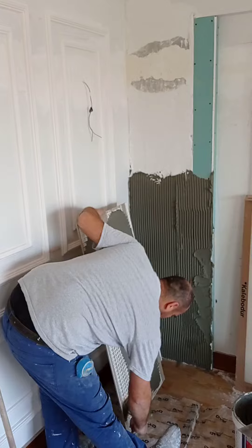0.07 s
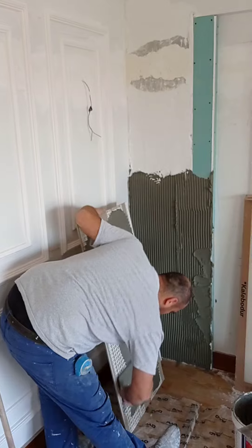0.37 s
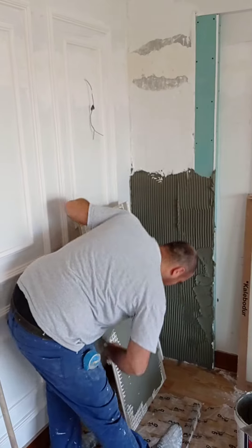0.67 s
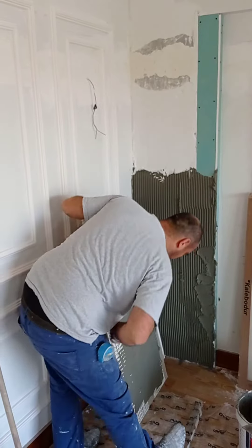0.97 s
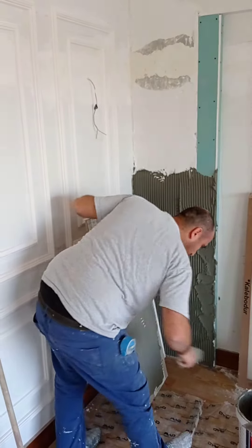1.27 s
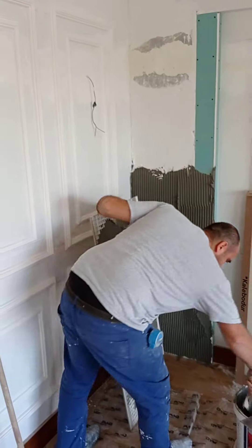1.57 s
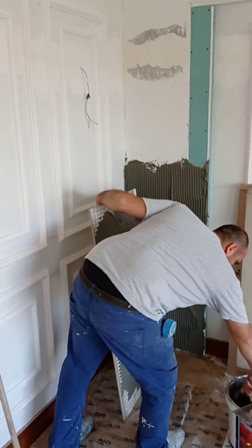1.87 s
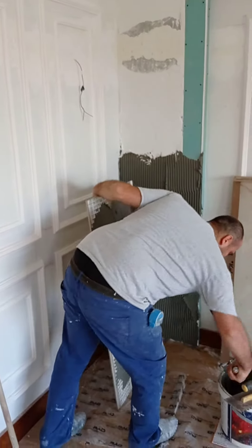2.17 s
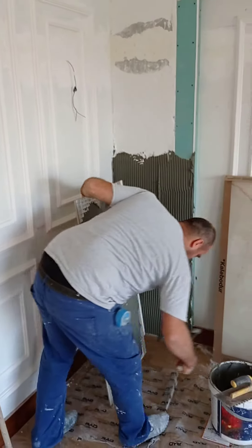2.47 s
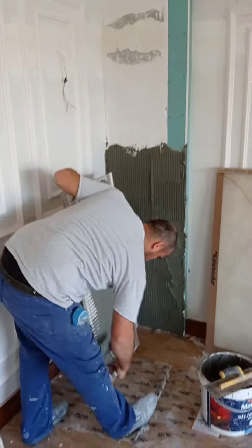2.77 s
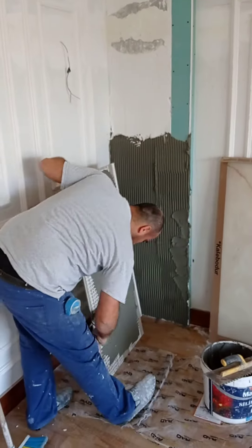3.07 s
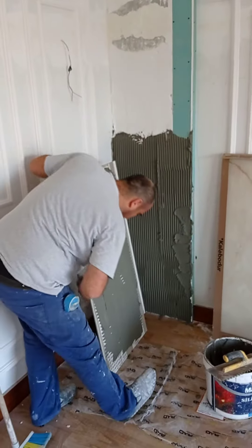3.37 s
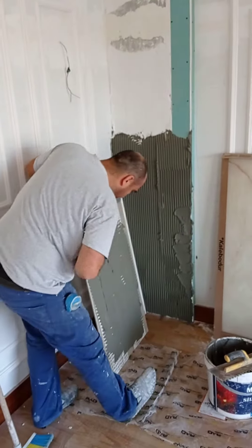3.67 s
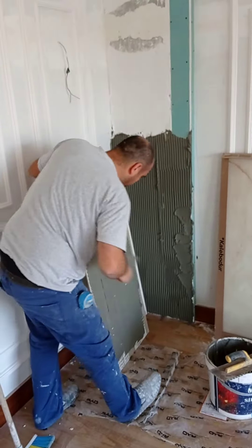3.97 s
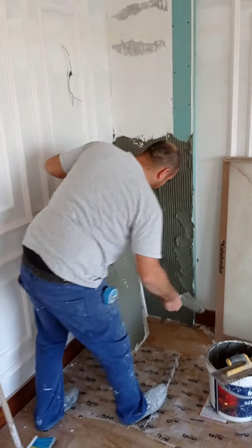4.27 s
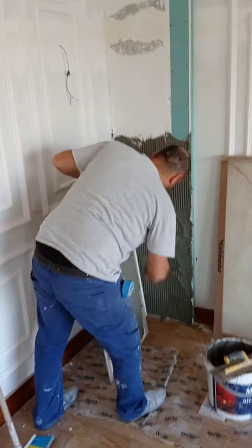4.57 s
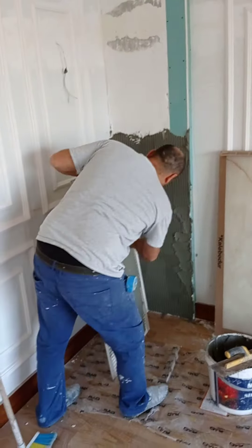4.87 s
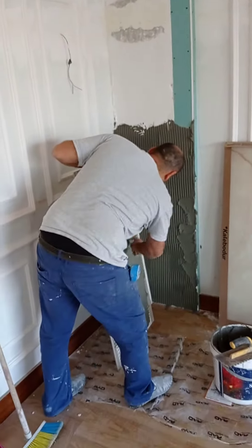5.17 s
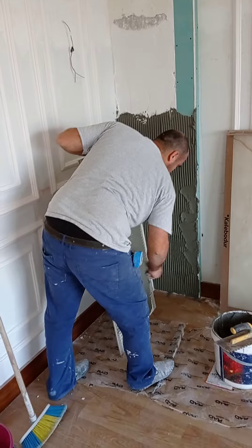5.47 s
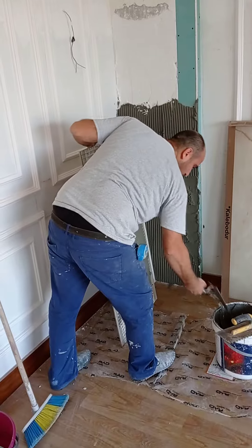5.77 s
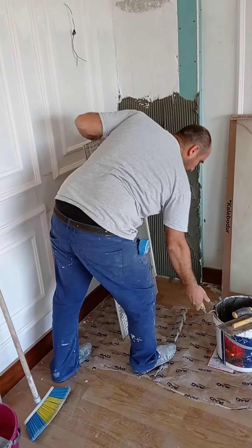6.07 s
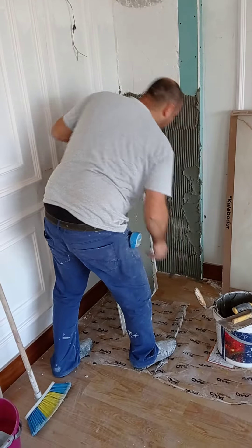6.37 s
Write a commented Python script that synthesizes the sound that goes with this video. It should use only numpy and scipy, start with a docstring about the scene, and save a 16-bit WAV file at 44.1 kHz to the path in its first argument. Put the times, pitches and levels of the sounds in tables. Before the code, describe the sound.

Three rasping trowel strokes over stone, with gritty clacks, a wet scoop and a hollow bucket knock, echo off bare walls.

```python
"""A notched steel trowel combs tile adhesive over a leaning stone slab: three strokes in a bare, echoing room.
Its teeth stick and slip on the stone, sand crunches under them, and slab and room drone together.
Between strokes it scoops from a plastic bucket and knocks on it; a shoe shuffles and the work ticks.
The microphone stands off in the room's echo, over a low rumble and a soft hush. The worker's body
shades the blade; bucket and slab arrive more directly. Both channels are alike."""
import sys
import numpy as np
from scipy import signal
from scipy.fft import rfft, irfft, next_fast_len
from scipy.io import wavfile
from scipy.ndimage import map_coordinates

SR = 44100
rng = np.random.default_rng(int(sys.argv[2]) if len(sys.argv) > 2 else 0)


def materialize(psi):
    """Save the field psi as 16-bit PCM at rate SR to the path in sys.argv[1].

    A 1-D psi becomes a single channel; in a 2-D psi each row is a channel.
    """
    bounded = np.clip(np.atleast_2d(psi).T, -1, 1)
    quanta = np.round(bounded * 32767).astype(np.int16)
    wavfile.write(sys.argv[1], SR, quanta)


N = 287532

# the blade lands on the slab: t/s, clack/dB, thud/dB, crunch/dB
BLADE_LANDINGS = [(0.131, -47, -44, -65), (0.148, -57, -40, -78), (2.942, -27, -30.5, -34.5),
                  (3.379, -21, -42, -27), (4.963, -40.5, -40.5, -45)]
# sandy crunch, with a thin microphone resonance near 15 kHz: f/Hz, level/dB
CRUNCH_SPECTRUM = [(1500, -50), (2500, -2), (3200, -4.5), (4200, -3), (5100, -5.5), (6600, -3.5),
                   (8000, -13), (10000, -17.5), (13500, -34), (15300, -22)]
# spectrum of the trowel's clack on slab or bucket: f/Hz, level/dB
CLACK_SPECTRUM = [(80, -9.5), (300, 15), (580, -4.5), (900, 8.5), (1400, 4), (2200, -4.5), (2900, -14.5),
                  (3600, -14), (5000, -14), (7100, -18.5), (10000, -33), (15000, -41)]


def pushing():
    """How hard the arm's pushes excite blade, stone and sand: each bites, then eases as it goes on."""
    # t/s, rise/s, length/s, blade level/dB, stone over blade/dB, sand over blade/dB, extra sand rise/s
    pushes = [(0.087, 0.28, 0.32, -26, -8.5, -9.5, 0.0022), (0.374, 0.032, 0.27, -19, -7, -11.5, 0.011),
              (0.616, 0.058, 0.19, -18.5, -3, -3.5, 0), (2.935, .012, 0.15, -43, 8, 1.5, 0.001),
              (2.994, 0.22, 0.29, -27, 2.5, -2.5, 0), (3.355, 0.028, 0.33, -22, -2.5, -8, 0.024),
              (5.041, 0.04, 0.25, -21.5, -9, -6.5, 0.046)]
    bite = dict(release=0.12, power=1.49)
    steel = stone = sand = 0
    for start, rise, length, db, stone_db, sand_db, gather in pushes:
        steel += amp(db) * swell(start, rise, length, sag_db_per_s=32.5, **bite)
        stone += amp(db + stone_db) * swell(start, rise, length, sag_db_per_s=21.5, **bite)
        # grains gather under the teeth, so the crunch swells for longer
        sand += amp(db + sand_db) * swell(start, rise + gather, length, sag_db_per_s=16, **bite)
    return steel, stone, sand


def strokes(drag, steel, stone, crunch):
    """The teeth judder over the stone: stone and blade rasp, paste drags and sand is crushed."""
    # spectra of the stone, the steel blade and the stiff paste: f/Hz, level/dB
    stone_spectrum = [(400, -58.5), (560, -27), (660, -4.5), (720, 0.5), (850, 1), (1040, -1), (1150, -1),
                      (1330, 3), (1480, -11.5), (1800, -19.5), (2600, -49.5)]
    steel_spectrum = [(900, -56), (1400, -7.5), (1600, 2.5), (1830, 4), (2150, 1), (2500, -3), (2750, -6.5),
                      (3100, -12), (4400, -52.5)]
    paste_spectrum = [(40, -61), (85, -28), (125, 6.5), (160, 4.5), (200, -0.5), (300, 1), (440, 2),
                      (495, -6), (560, -12.5), (800, -7), (1500, -46.5)]
    judder = unit(amp(2.4 * wobble(130)))
    teeth = judder * slips(rate=2200, spread_db=4.5)
    grains = judder * slips(rate=7000, spread_db=5)
    rasp = through(stone * teeth, colour(stone_spectrum))
    blade = amp(-0.5) * through(steel * teeth, colour(steel_spectrum))
    paste = amp(-7) * through(drag * slips(rate=980, spread_db=-1), colour(paste_spectrum))
    sand = amp(1) * through(crunch * grains, colour(CRUNCH_SPECTRUM))
    return rasp + blade + paste + sand


def landings():
    """The blade is set down on the coated slab with a gritty clack."""
    times, clack_db, _, crunch_db = np.transpose(BLADE_LANDINGS)
    clack = through(blows(times, clack_db, chatter=0.37, chatter_s=0.066), colour(CLACK_SPECTRUM))
    crunch = through(blows(times, crunch_db, chatter=0.44, chatter_s=0.056), colour(CRUNCH_SPECTRUM))
    return clack + crunch


def hollow_ring(stone):
    """The scraping keeps slab and room ringing, which makes the rasp hollow."""
    # ringing pitches of the slab and the room together: f/Hz, width/Hz, level/dB
    pitches = [(437.5, 5.4, 7.5), (583, 8.5, 9), (705.4, 5, 14.5), (765, 25, -1), (772, 7, -4.5),
               (888, 13, -24.5), (1154, 5.1, 18.5), (1276, 6.2, 14.5), (1290, 12, -11), (1502, 4.8, 17),
               (1691, 16, 11.5), (1971, 12, 13.5), (2133, 50, 10), (2260, 13, -7), (2420, 10, -8.5),
               (2767, 3.3, 9.5)]
    return amp(-3.5) * through(stone * rng.standard_normal(N), ring(pitches))


def drone(drag):
    """The drag bows the slab's lowest mode; at times the scraping sets off a groan of slab and room."""
    # low groans of slab and room: t/s, length/s, level/dB
    groans = [(.33, 0.76, -51), (3.11, .11, -35), (3.62, 0.16, -36), (5.24, 0.035, -40.5)]
    groan = gestures(groans, rise=0.027, release=0.48)
    low = amp(-8.5) * driven_mode(drag, hz=138.4, t60=0.51, drift_hz=3.27, waver_db=1.8)
    middle = driven_mode(groan, hz=357, t60=0.5, drift_hz=1.3, waver_db=1.2)
    high = amp(-10) * driven_mode(groan, hz=458, t60=0.3, drift_hz=2.5, waver_db=2.5)
    return low + middle + high


def slab_thuds():
    """Each landing of the blade sets the leaning slab swinging."""
    # modes of the struck slab: f/Hz, width/Hz, level/dB
    thud_modes = [(163.5, 3, 18), (200, 12, -24), (251, 3, -6)]
    times, _, thud_db, _ = np.transpose(BLADE_LANDINGS)
    return through(blows(times, thud_db, chatter=0), ring(thud_modes))


def bucket_and_shoe():
    """Wet adhesive squelches on the blade, the plastic wall booms when struck, and a shoe shuffles."""
    # the trowel digs in; then a faint shoe shuffle: t/s, length/s, level/dB
    moves = [(2.04, 0.23, -44.5), (2.35, .48, -62)]
    # spectrum of the squelch and the shuffle: f/Hz, level/dB
    rub_spectrum = [(150, -18.5), (350, 14.5), (560, -2.5), (780, 8), (1100, 0), (2500, 0), (4000, -4.5),
                    (6600, -2.5), (8500, -13), (13000, -27.5), (15300, -17)]
    # blows on the bucket: t/s, wall/dB, clack/dB
    knocks = [(1.937, -59, -81), (2.085, -40, -42), (2.128, -47, -66), (2.169, -43, -59), (2.247, -43, -60),
              (2.326, -45, -73), (5.9248, -26, -30), (5.931, -31.5, -27.5)]
    # modes of the plastic wall: f/Hz, width/Hz, level/dB
    wall_modes = [(183.5, 3.6, -4), (328, 12, 13), (344, 35, 4.5), (425, 27, -13.5), (960, 20, -21),
                  (3300, 39, -9.5)]
    times, wall_db, clack_db = np.transpose(knocks)
    moving = gestures(moves, rise=0.049, release=0.31)
    rub = through(moving * slips(rate=2500, spread_db=4), colour(rub_spectrum))
    wall = through(blows(times, wall_db, chatter=0.005), ring(wall_modes))
    clack = through(blows(times, clack_db, chatter=0.33, chatter_s=0.02), colour(CLACK_SPECTRUM))
    return rub + wall + clack


def ticks():
    """Short bright ticks with no ring of their own."""
    # ticks from the work: t/s, level/dB
    work_ticks = [(1.459, -52), (1.575, -40), (1.581, -81), (1.964, -50), (2.574, -49.5), (2.619, -46.5),
                  (4.291, -54), (4.515, -48), (6.146, -69), (6.452, -61.5)]
    # spectrum of a tick: f/Hz, level/dB
    tick_spectrum = [(600, -15), (2000, -3), (3300, 1), (4500, 5.5), (7200, 1), (8500, -10), (12000, -17.5),
                     (15300, -15.5)]
    times, db = np.transpose(work_ticks)
    return through(blows(times, db, chatter=0.25), colour(tick_spectrum))


def room(x, standing_scale):
    """Bare plaster walls: fixed standing waves in the bass, an ever-changing diffuse echo higher up."""
    # reverberation time: f/Hz, t60/s
    decay_times = [(100, 1.67), (300, 1.14), (700, 1.207), (1800, 1.374), (4000, 1.01), (6500, 0.97),
                   (9000, 0.76), (13000, 0.4)]
    # standing waves: f/Hz, share of the echo's energy
    standing_shares = [(500, .9), (900, .8), (2000, .66), (5000, .45)]
    hz, t, sound = signal.stft(x, SR, nperseg=256)
    t = t[t < 1.4]
    decay = amp(-60 * t / along(decay_times, hz)[:, None])
    decay[:, 0] = 0  # the first reflection needs a moment to arrive
    decay /= np.linalg.norm(decay[np.searchsorted(hz, 1000)])
    share = np.clip(standing_scale * along(standing_shares, hz), 0, 1)[:, None]
    tail_noise, wash = signal.stft(rng.standard_normal((2, N)), nperseg=256)[2]
    # standing waves answer every sound alike, so their pitches stay
    tail = signal.istft(tail_noise[:, :len(t)] * decay * np.sqrt(share), nperseg=256)[1]
    standing = through(x, tail) / np.sqrt(SR * t[1])
    # the diffuse part keeps only the energy of the sound, band by band
    energy = signal.fftconvolve(np.abs(sound) ** 2, decay ** 2 * (1 - share), axes=1)
    envelope = np.sqrt(np.abs(energy[:, :sound.shape[1]]))
    diffuse = signal.istft(wash / np.std(wash) * envelope, nperseg=256)[1]
    return standing + np.pad(diffuse, (128, 0))[:N]


def background():
    """Room tone: a low uneven rumble and a soft midrange hush, both coming up over the first seconds."""
    # course of the rumble: t/s, level/dB
    rumble_levels = [(0, -86), (1.5, -67.5), (2.5, -59), (4.3, -56.5), (4.8, -61.5), (6.5, -56)]
    # spectra of the rumble and the hush: f/Hz, level/dB
    rumble_spectrum = [(20, -44.5), (45, -31), (62, 2.5), (80, -6.5), (110, 2), (200, -3), (330, -6),
                       (520, -18.5), (900, -56)]
    hush_spectrum = [(300, 7.5), (600, -5), (850, 9), (1400, 5), (2100, 0.5), (2900, -15.5), (5000, -17),
                     (6800, -30), (10000, -28), (15000, -98)]
    t = np.arange(N) / SR
    rumble_db = np.interp(t, *np.transpose(rumble_levels))
    hush_db = -58 - 11 * np.maximum(1 - t / 3.1, 0)
    rumble = amp(rumble_db + 0.6 * wobble(9)) * through(rng.standard_normal(N), colour(rumble_spectrum))
    hush = amp(hush_db + 0.31 * wobble(4.3)) * through(rng.standard_normal(N), colour(hush_spectrum))
    return rumble + hush


def driven_mode(drive, hz, t60, drift_hz, waver_db):
    """A mode kept going by the scraping: it follows the drive, wavers and rings out."""
    keep = amp(-60 / (t60 * SR))
    swing = signal.lfilter([1 - keep], [1, -keep], drive)
    phase = 2 * np.pi * np.cumsum(hz + drift_hz * wobble(11)) / SR
    return swing * unit(amp(waver_db * wobble(22)) * np.sin(phase))


def slips(rate, spread_db):
    """Tiny random jolts of scattered sizes, about rate a second, rms 1."""
    happens = rng.random(N) < rate / SR
    direction = np.sign(rng.standard_normal(N))
    size = amp(spread_db * np.clip(rng.standard_normal(N), -2, 2))
    return unit(happens * direction * size)


def blows(times, levels_db, chatter, chatter_s=0.031):
    """Contact forces: a push and a brief dying chatter; the level is the rms over 10 ms."""
    force, t = np.zeros(N + SR), np.arange(SR // 10) / SR
    for start, db in zip(times, levels_db):
        pulse = chatter * rng.standard_normal(len(t)) * amp(-60 * t / chatter_s)
        pulse[0] = 1
        force[round(start * SR):][:len(t)] += amp(db) * pulse / np.linalg.norm(pulse) * np.sqrt(SR / 100)
    return force[:N]


def swell(start, rise, length, release, power=1, sag_db_per_s=0):
    """Gain of one gesture: it rises, holds or sags, then falls 60 dB over the release; times in s."""
    t = np.maximum(np.arange(N) / SR - start, 0)
    fall_db = sag_db_per_s * np.maximum(t - rise, 0) + 60 * np.maximum(t - length, 0) / release
    return np.minimum(t / rise, 1) ** power * amp(-fall_db)


def gestures(rows, rise, release):
    """Summed gain of gestures that share one shape."""
    return sum(amp(db) * swell(start, rise, length, release) for start, length, db in rows)


def ring(modes):
    """Impulse response of energy 1 of damped modes, each swelling over its first cycle."""
    t = np.arange(SR // 2) / SR
    response = 0
    for hz, width, db in modes:
        envelope = np.exp(-np.pi * width * t) * (1 - np.exp(-2 * hz * t))
        response += amp(db) * width * envelope * np.sin(2 * np.pi * hz * t)
    return response / np.linalg.norm(response)


def colour(points):
    """Minimum-phase impulse response of energy 1 with the given spectral shape."""
    size = 16384
    db = np.maximum(along(points, np.fft.rfftfreq(size, 1 / SR)), -120)
    cepstrum = irfft(np.log(amp(db)))
    cepstrum[1:size // 2] *= 2
    cepstrum[size // 2 + 1:] = 0
    response = irfft(np.exp(rfft(cepstrum)))
    return response / np.linalg.norm(response)


def through(x, response):
    """Pass a signal through an impulse response."""
    return signal.fftconvolve(x, response)[:N]


def wobble(rate):
    """A smooth random curve, rate knots a second."""
    return map_coordinates(rng.standard_normal(int(N * rate / SR) + 4), [np.arange(N) * rate / SR])


def along(points, hz):
    """Read (f/Hz, value) points on a log axis."""
    freqs, values = np.transpose(points)
    return np.interp(np.log(hz + 1), np.log(freqs), values)


def amp(db):
    """Decibels to gain."""
    return 10 ** (np.asarray(db) / 20)


def unit(x):
    """Scale to rms 1."""
    return x / np.sqrt(np.mean(x ** 2) + 1e-20)


def scene():
    """At the microphone: the blade shaded by the worker, the bucket and the wide slab more direct."""
    # the blade lies in the paste, once per stroke: t/s, length/s, level/dB
    contacts = [(0.14, 0.68, -34), (2.945, 0.84, -33), (4.97, 0.28, -34)]
    drag = gestures(contacts, rise=0.04, release=0.4)
    steel, stone, crunch = pushing()
    blade = strokes(drag, steel, stone, crunch) + landings()
    ticking, handling = ticks(), bucket_and_shoe()
    direct = amp(-8.5) * blade + amp(-12) * ticking + amp(-5.5) * handling
    echo = room(blade + handling, standing_scale=1) + room(ticking, standing_scale=0.1)
    mono = direct + amp(-3) * echo + hollow_ring(stone) + drone(drag) + slab_thuds() + background()
    return np.array([mono, mono])


def record(dry):
    """The microphone opens just after the start, drops the deep bass and cuts off the top treble."""
    open_s, low_cut_hz, top_hz = 0.078, 52, 15800
    opened = dry * (np.arange(N) / SR >= open_s)
    lean = signal.sosfilt(signal.butter(2, low_cut_hz, "highpass", fs=SR, output="sos"), opened)
    size = next_fast_len(N + SR // 2)
    passband = np.fft.rfftfreq(size, 1 / SR) < top_hz
    return irfft(rfft(lean, size) * passband, size)[:, :N]


dry = scene()
out = record(dry)
materialize(out)
```